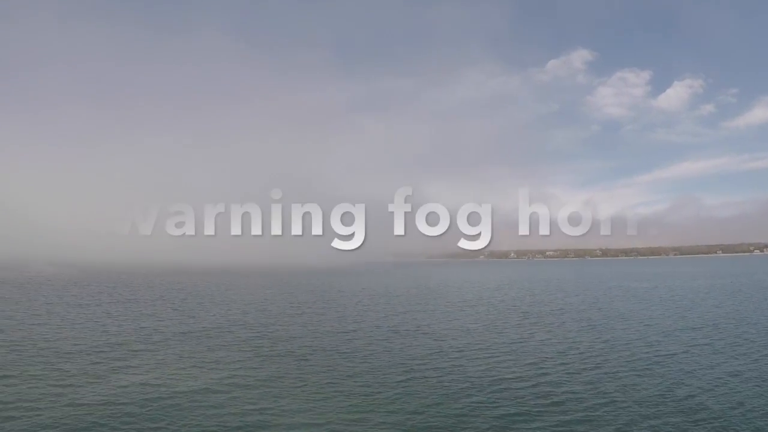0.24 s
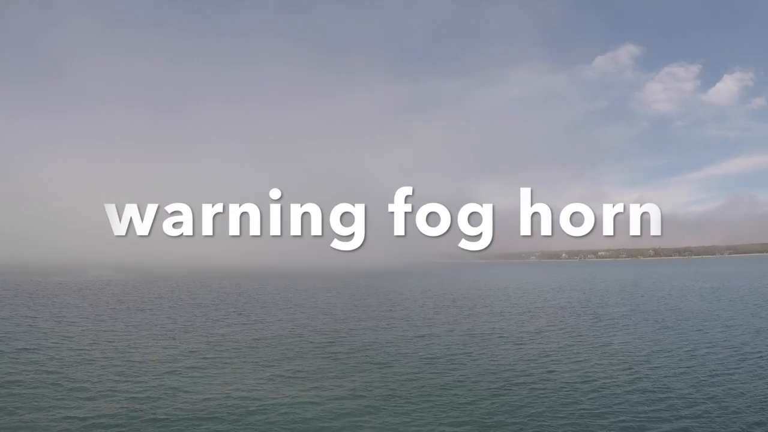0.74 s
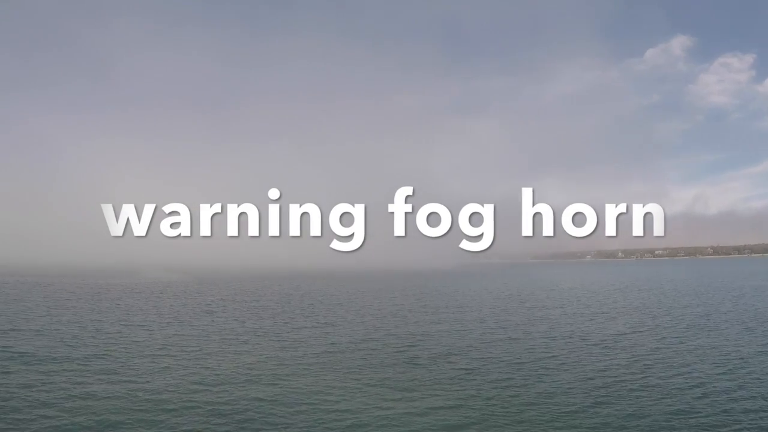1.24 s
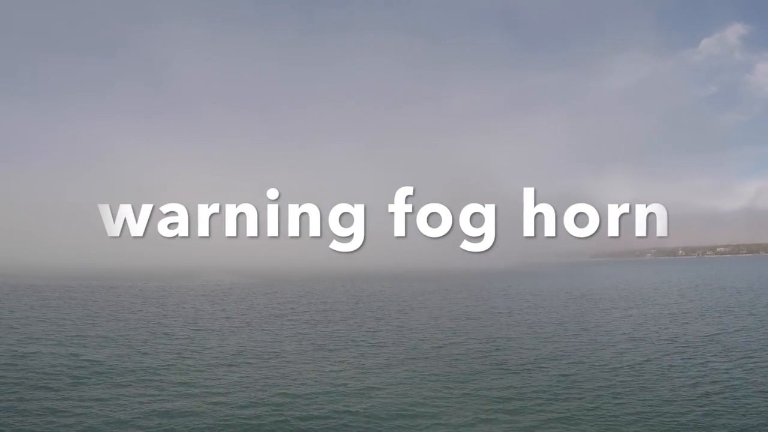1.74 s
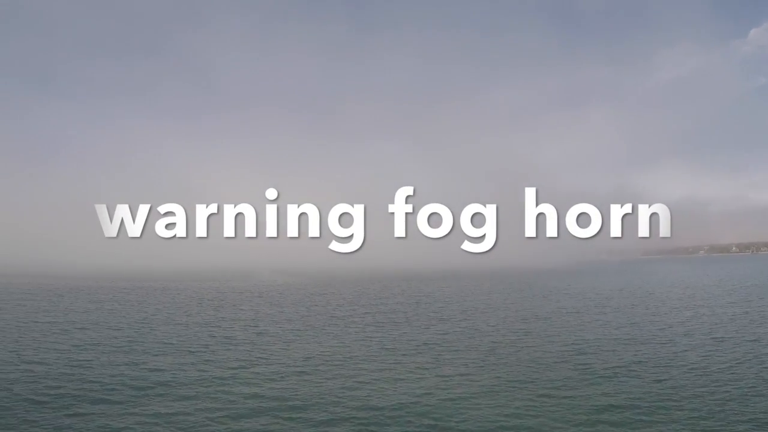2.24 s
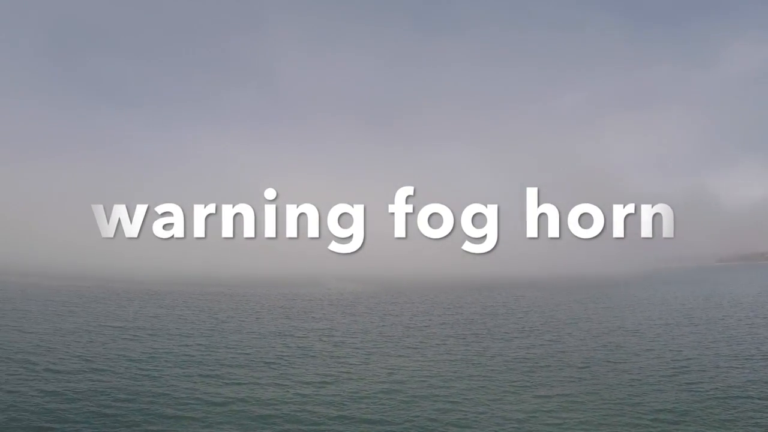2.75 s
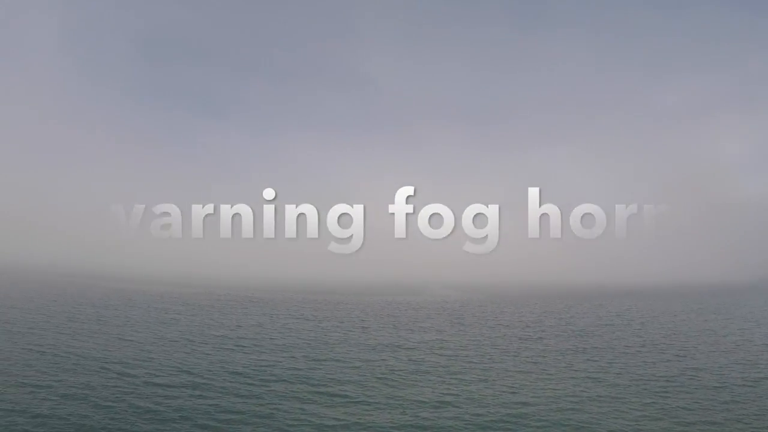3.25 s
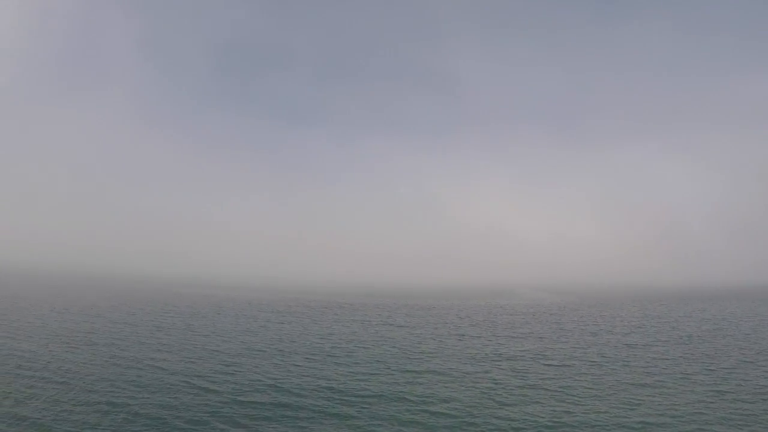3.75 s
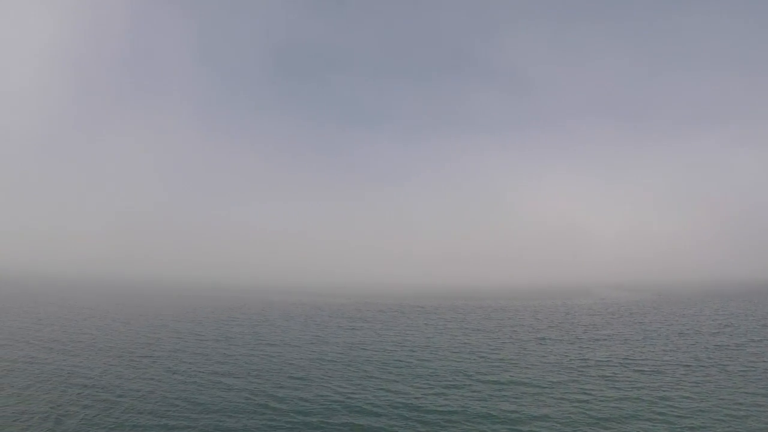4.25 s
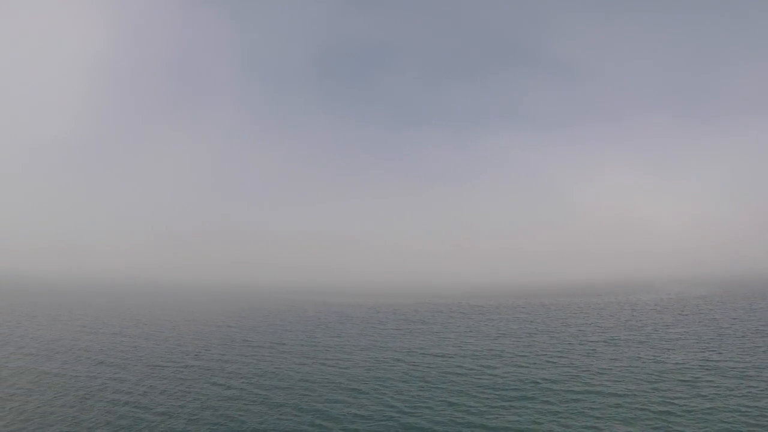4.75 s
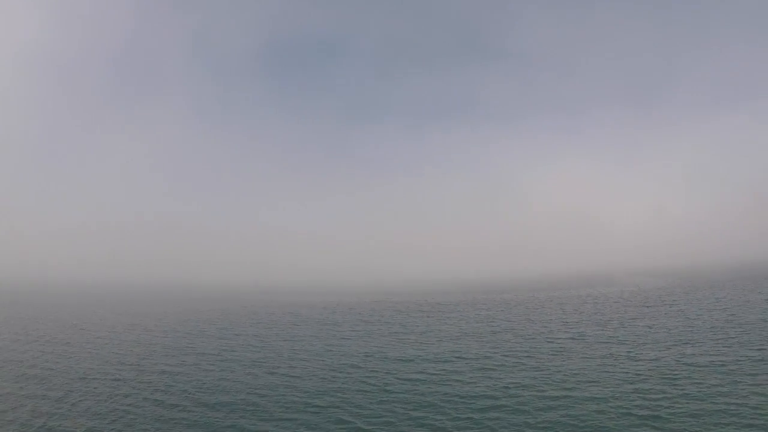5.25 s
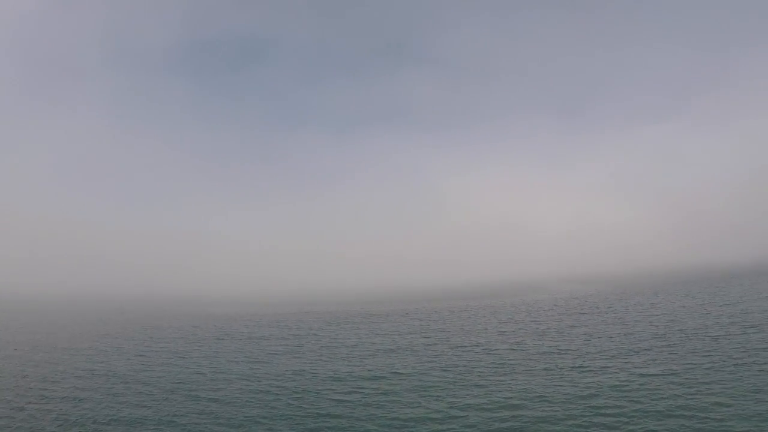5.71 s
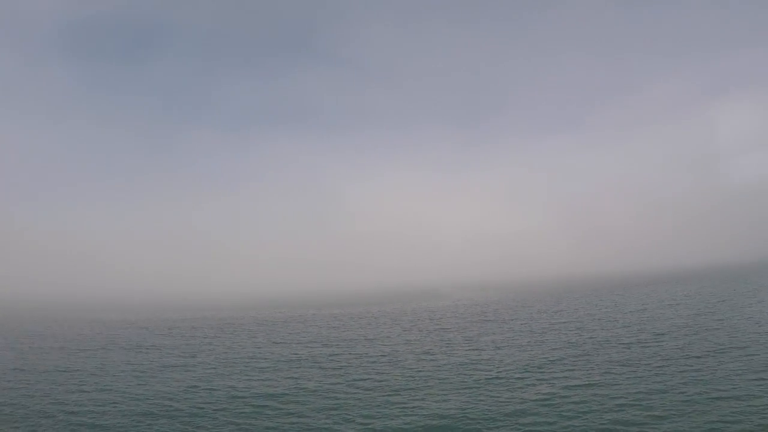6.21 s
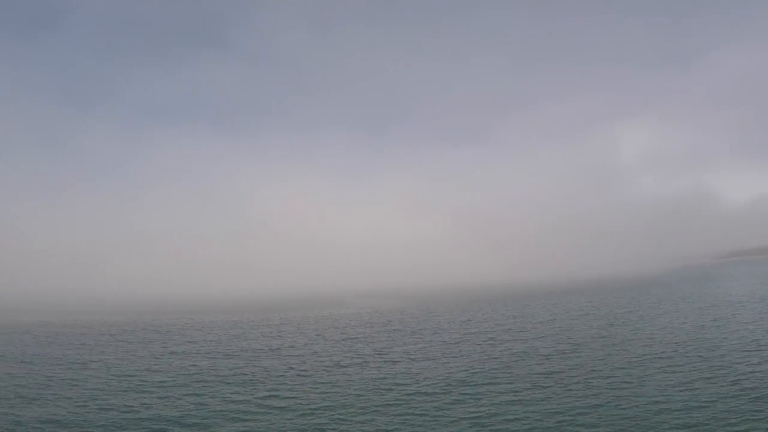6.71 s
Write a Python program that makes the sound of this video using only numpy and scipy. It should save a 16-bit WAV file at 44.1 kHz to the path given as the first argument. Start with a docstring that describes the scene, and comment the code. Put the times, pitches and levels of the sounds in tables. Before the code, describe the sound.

A camera microphone on an open ferry deck takes deep wind buffeting, with a few sharp thumps at the start. Waves wash and hiss along the hull, then wind flutter and wet slaps thicken after three seconds. At about 4.7 seconds a single loud reed horn enters brassy, settles to a steady note near middle C, and holds to the end, pushing wind and water down.

```python
"""A ferry's fog horn heard from the open deck: from 4.7 s to the end it sounds one long reed tone, a sum of
partials whose overtones swell and fade in the moving air, with a faint Doppler-spread answer from the waves.
Wind buffets the microphone, as shaped noise and single suction pulses. Waves break and hiss along the hull,
as noise bands, droplets and ringing slaps, with open sea behind. The camera's limiter pushes all of it down
when the sum is loud, so wind and water sink beneath the horn."""
import sys
import numpy as np
from scipy import signal
from scipy.fft import rfft, irfft, next_fast_len
from scipy.io import wavfile
from scipy.ndimage import uniform_filter1d, minimum_filter1d, map_coordinates

SR = 44100
rng = np.random.default_rng(int(sys.argv[2]) if len(sys.argv) > 2 else 0)


def wav_out(sig):
    """Save sig, one row per channel (or a flat mono array), as 16-bit PCM at SR to the path in sys.argv[1]."""
    wavfile.write(sys.argv[1], SR, np.round(np.clip(np.atleast_2d(sig).T, -1, 1) * 32767).astype(np.int16))


N = 307377

BLAST_S = 4.691  # the horn starts
PITCH_HZ = 265.1  # the settled pitch
SHARP_HZ, SETTLE_S = 3.4, 0.125  # the reed starts sharp and settles
HORN_DB = -1  # gain of the whole horn, echo included
FADING_DB = 1.1  # chance fading of the overtones in the moving air
SPEAK_S, SPEAK_S_PER_MULTIPLE = 0.0091, 0.0029  # how fast the fundamental speaks; extra time per overtone
DISPERSION_RAD = 0.55  # the bell smears the reed's pulse: lag of partial 2, growing as (k - 1) squared
ECHO_BUILD_S = 0.014  # how fast the echo builds up
GLINT_S = 0.065  # half the length of a glint

# single partials that swell or fade for a moment in the moving air:
# (time [s], half length [s], multiple of the pitch, level change [dB])
FLARE_MOMENTS = [(4.715, .025, 2, 5), (6.3, 0.062, 2, 1), (4.79, 0.054, 3, 7.5), (7.7, 0.021, 3, -5),
                 (5.01, 0.039, 3, -11.5), (4.755, .035, 4, 3.5), (4.87, 0.066, 4, 4),
                 (4.97, 0.015, 4, -5.5), (5.25, .1, 4, 0.5), (4.76, 0.029, 5, 5.5), (4.93, .025, 5, -7),
                 (5.01, .06, 5, 3.5), (5.75, 0.088, 5, -12), (6.09, 0.12, 5, 10.5), (5.0, .045, 6, -8),
                 (4.6, 0.092, 6, 4), (6.42, .15, 6, -12.5), (6.75, .15, 6, 4), (8.7, .015, 6, 8),
                 (4.78, .03, 6, -11), (4.75, .035, 7, 7), (4.88, .025, 7, -9), (5.44, .07, 7, -11.5),
                 (5.88, .09, 7, -8), (4.735, .022, 8, 4), (4.705, .014, 5, -7), (4.8, 0.033, 9, 6.5),
                 (4.82, .025, 8, -7.5), (4.89, 0.023, 8, 8), (6.35, .13, 8, -12), (6.85, 0.17, 8, 5),
                 (5.3, .1, 9, -9.5), (5.66, .11, 9, 7), (5.95, .12, 9, -9), (6.48, 0.23, 12, 13.5),
                 (6.5, .09, 13, 10), (6.1, .08, 14, 9)]
# partials that the waves return:
# (multiple of the pitch, level at the blast's start before horn gain [dB], drift [dB/s])
ECHO_PARTIALS = [(1, -32.5, -2), (2, -31.5, -1), (3, -35, -2.5), (4, -39.5, -5.5), (5, -39, -4.5),
                 (6, -47, -2.5), (7, -49.5, -1), (8, -53, -1.5)]
# moments when a wave mirrors one partial strongly:
# (time [s], multiple of the pitch, level over the usual echo [dB])
GLINT_MOMENTS = [(4.92, 3, 9.5), (4.86, 6, 6.5), (5.56, 2, 7.5), (5.56, 3, 0), (5.56, 6, 11), (5.88, 4, 12),
                 (5.93, 3, 3.5), (6.03, 4, 12.5), (6.09, 5, 13), (6.11, 7, 8.5), (6.13, 6, 7), (6.19, 2, 7),
                 (6.19, 3, 6.5), (6.33, 3, 5.5), (5.19, 2, 6), (6.65, 2, 9), (6.72, 5, 7.5), (6.75, 3, 9.5)]


def horn():
    """The reed's partials share one pitch; the high ones shake and fade most, roughest as the blast starts."""
    age = np.maximum(clock() - BLAST_S, 0)
    pitch_hz = PITCH_HZ + SHARP_HZ * np.exp(-(age / SETTLE_S) ** 2) + 0.13 * wobble(7.9)
    phase = 2 * np.pi * np.cumsum(pitch_hz) / SR
    return amp(HORN_DB) * (direct_horn(age, phase) + returned_horn(age, phase))


def direct_horn(age, phase):
    """Partials straight from the bell, each with its own fading, shake, lag and speaking time."""
    out = np.zeros(N)
    for k, level_db in partials(age):
        flare_db = sum(db * bump(s, half) for s, half, which, db in FLARE_MOMENTS if round(which) == k)
        fading_db = FADING_DB * min((k - 1) / 2, 1) * wobble(14)
        size = np.sqrt(2) * amp(level_db + flare_db + fading_db)
        shake = min(0.013 * k, 0.3) * (1 + 2.5 * np.exp(-age / 0.25))
        shake = np.minimum(shake, 0.35)
        lag = DISPERSION_RAD * (k - 1) ** 2
        tone = size * (1 + shake * wobble(35)) * np.cos(k * phase + shake * wobble(25) - lag)
        # the overtones speak a little after the fundamental
        rise_s = SPEAK_S + SPEAK_S_PER_MULTIPLE * min(k - 1, 10)
        out += tone * (1 - np.exp(-(age / rise_s) ** 2))
    return out


def returned_horn(age, phase):
    """The echo builds up as the sound spreads over the water, and comes and goes with the waves."""
    out = np.zeros(N)
    spread = 1 - np.exp(-age / ECHO_BUILD_S)
    for order, level_db, drift_db_per_s in ECHO_PARTIALS:
        k = round(order)
        glint_db = sum(db * bump(s, GLINT_S) for s, which, db in GLINT_MOMENTS if round(which) == k)
        out += amp(level_db + drift_db_per_s * age + glint_db) * spread * sea_echo(phase, k)
    return out


SWELL_S = 0.16  # time for the brassy start to give way
# the sheen's offset; its extra at the start; time to dull
SHEEN_DB, SHEEN_START_DB, SHEEN_S = -9, 10.5, 0.8

# horn partials in order, each sliding once to a new level:
# (multiple of the pitch, level before swell and gain [dB], slide [dB], slide middle [s], half slide time [s])
HORN_PARTIALS = [(1, -0.5, 0, 6, .14), (2, -12.5, -6, 6.58, .14), (3, -21, -12, 6.07, 0.056),
                 (4, -26.5, -17.5, 5.49, .24), (5, -27, -15.5, 5.87, .2), (6, -37.5, -6.5, 6.1, .14),
                 (7, -45, 3.5, 6.55, .1), (8, -47.5, -0.5, 6.1, .14), (9, -51.5, 10, 6.4, .25),
                 (10, -57.5, 15.5, 5.82, .1), (11, -54, 4.5, 6.65, .1), (12, -49.5, -11.5, 5.58, .14),
                 (13, -52.5, 3.5, 7.1, .14)]
# the brassy start, before the lowest partials swell: (frequency [Hz], level change at the start [dB])
BRASSY_START = [(265, -9.5), (530, -9.5), (795, 1.5), (1060, 0.5), (1325, -1.5), (1590, 1), (2400, 6.5),
                (3500, -2.5), (7000, 3)]
# the horn's thin top: (frequency [Hz], level before the sheen offset [dB])
SHEEN_SPECTRUM = [(3700, -51.5), (4300, -56.5), (5200, -61.5), (6200, -69.5), (7100, -55.5), (8000, -66.5),
                  (9300, -80.5)]


def partials(age):
    """Each multiple of the pitch with its level in dB: a reed starts brassy, then its lowest partials swell."""
    t = clock()
    early = np.exp(-(age / SWELL_S) ** 2)
    for k, (_, db, slide_db, slide_at, slide_s) in enumerate(HORN_PARTIALS, 1):
        slid = (1 + np.tanh((t - slide_at) / slide_s)) / 2
        yield k, db + along(BRASSY_START, k * PITCH_HZ) * early + slide_db * slid
    for k in range(len(HORN_PARTIALS) + 1, 33):
        dulling_db = SHEEN_START_DB * np.exp(-age / SHEEN_S)
        yield k, SHEEN_DB + along(SHEEN_SPECTRUM, k * PITCH_HZ) + dulling_db


def sea_echo(phase, order, spread_hz=90):
    """Waves all round the moving ship return a partial with a spread of Doppler shifts, at rms 1."""
    sine = np.sin(order * phase)
    around = wobble(2 * spread_hz) * sine + wobble(2 * spread_hz) * np.cos(order * phase)
    # the water straight ahead answers sharpest in pitch
    ahead = 0.9 * wobble(22) * np.sin(order * phase * 1.036)
    # choppy water gives each partial a wide, fluttering skirt
    chop = 0.22 * wobble(330) * sine * amp(4 * np.tanh(wobble(35)))
    coming_and_going_db = 4.5 * np.tanh(wobble(24)) + 1.5 * np.tanh(wobble(9))
    return unit((around + ahead + chop) * amp(coming_and_going_db))


# wind on the microphone, before trims and rounding: (time [s], deep buffet level [dB], flutter level [dB])
WIND_GUSTS = [(0, -21.5, -24), (.5, -24.5, -24), (.9, -21.5, -28), (1.3, -21, -27), (1.55, -22.5, -25),
              (1.95, -24.5, -24), (2.35, -22, -26), (2.65, -24, -27.5), (3.03, -22.5, -22),
              (3.33, -25.5, -17.5), (3.75, -24, -17), (4.25, -27.5, -18), (4.6, -28.5, -17),
              (5.35, -31, -20), (6.1, -25, -23), (6.97, -24.5, -27.5)]
# how regularly the camera body sheds eddies: (time [s], share of flutter power, clipped to 0-1 [fraction])
SHEDDING_SHARE = [(0, 0.08), (2.9, 0.07), (3.3, 1.02), (4.6, 0.55), (5, 0.08), (6.97, 0.7)]
# large eddies: (frequency [Hz], relative level [dB per Hz])
BUFFET_SPECTRUM = [(8, -10), (22, -5), (45, -6), (62, -6.5), (90, -30.5), (200, -50.5), (600, -89)]
# small eddies: (frequency [Hz], relative level [dB per Hz])
FLUTTER_SPECTRUM = [(35, -26), (65, -2.5), (90, 3.5), (122, -3.5), (155, -12), (210, -16), (320, -21.5),
                    (900, -73)]
# steadily shed eddies, before soft clipping: (frequency [Hz], relative level [dB per Hz])
VORTEX_SPECTRUM = [(40, -22.5), (62, 3), (75, 2.5), (98, 2), (122, -1.5), (140, -8), (175, -28), (300, -42),
                   (900, -71.5)]


def wind():
    """Large and small eddies push on the microphone; head on, the body sheds them at a steadier rate."""
    buffet_db, flutter_db = curves(WIND_GUSTS)
    share = np.clip(curves(SHEDDING_SHARE)[0], 0, 1)
    shed = unit(np.tanh(0.41 * noise(VORTEX_SPECTRUM, patchy_db=2.0)))
    shed = coloured(shed, [(200, 6), (400, -6.5), (1500, -50.0)])
    flutter = np.sqrt(1 - share) * noise(FLUTTER_SPECTRUM, patchy_db=0.5) + np.sqrt(share) * shed
    surge_db = wobble(5)
    eddies = amp(buffet_db + 0.4 + surge_db) * noise(BUFFET_SPECTRUM, patchy_db=0.3)
    # steady shedding does not surge
    eddies += amp(flutter_db - 0.38 + (1 - share) * surge_db) * flutter
    # the strongest pushes are rounded off
    return eddies / (1 + (eddies / 0.37) ** 4) ** (1 / 4)


# eddies that strike the microphone: (time [s], peak level [dB], width [s])
EDDY_POPS = [(0.0236, -11, 0.0011), (0.035, -8, 0.0019), (0.037, -16.5, 0.00037), (0.078, -20.5, 0.00088),
             (0.118, -16, 0.0016), (0.149, -13, 0.0012), (0.199, -10, 0.00064), (.609, -13.5, 0.002),
             (4.746, -12, 0.0017), (5.59, -20, .002)]


def pops():
    """A sharp eddy gives one brief suction with a rebound on either side."""
    out = np.zeros(N)
    for s, db, width in EDDY_POPS:
        u = (clock() - s) / width
        out -= amp(db) * (1 - u ** 2) * np.exp(-u ** 2 / 2) / (1 + 0.5 * u ** 2)
    return out


# rushing air: (frequency [Hz], relative level [dB per Hz])
RUSH_SPECTRUM = [(120, -28.5), (230, -10), (330, 3.5), (480, 0), (720, -3.5), (1000, -16.5), (1600, -15.5),
                 (4000, -68)]
# crackle while the wind meets the microphone head on: (time [s], level against the untrimmed rush [dB])
CRACKLE_LEVEL = [(0, -15.5), (3.2, -19.5), (3.6, -6), (4.05, -5.5), (4.25, -12), (4.55, -4.5), (4.8, -14),
                 (6.97, -11.5)]


def rushing_air():
    """Air rushes past the microphone, growing with the flutter, and eddies crackle in it as short bursts."""
    # -27 dB at full-scale flutter, before the air's trim; 0.52 dB per dB of flutter
    rush_db = -27 + 0.52 * curves(WIND_GUSTS)[1]
    air = amp(rush_db - 6 + 0.69 * wobble(41)) * noise(RUSH_SPECTRUM, patchy_db=2.0)
    bursts = droplets(rush_db, centre_hz=777, cycles=0.71, spread_db=2.0)
    return air + amp(curves(CRACKLE_LEVEL)[0]) * bursts


# wash along the hull: (frequency [Hz], relative level [dB per Hz])
WASH_SPECTRUM = [(250, -20), (500, -6), (850, -1.5), (1250, 0), (1650, -1.5), (2100, -6.5), (2550, -11),
                 (3000, -16.5), (4500, -15.5), (9000, -65.5)]
# tumbling crests: (frequency [Hz], relative level [dB per Hz])
CREST_SPECTRUM = [(800, -26), (1350, -5.5), (1700, -0.5), (2050, -2), (2500, -9), (3100, -22.5),
                  (5000, -50)]
# spray: (frequency [Hz], relative level [dB per Hz])
SPRAY_SPECTRUM = [(1800, -20), (3050, -17.5), (3600, 1.5), (4100, 1), (5000, -4.5), (6000, -10.5),
                  (7500, -24), (10000, -49.5)]
# fizzing foam: (frequency [Hz], relative level [dB per Hz])
FIZZ_SPECTRUM = [(3500, -26.5), (5200, 0), (6200, 1), (7200, -1), (8300, -9), (10000, -19), (12500, -57)]


def breaking_waves():
    """Water along the hull: wash, tumbling crests, spray, fizzing foam and droplets, each a noise band or burst."""
    wash_db, crest_db, spray_db, fizz_db = surf()
    surge_db = wobble(30)
    wash = amp(wash_db - 1.1 + 0.9 * surge_db) * noise(WASH_SPECTRUM, patchy_db=1.5)
    crest = amp(crest_db + 1.2 * wobble(45)) * noise(CREST_SPECTRUM, patchy_db=1.5)
    spray = amp(spray_db - 1.5) * noise(SPRAY_SPECTRUM, patchy_db=0.8)
    fizz = amp(fizz_db + 2.0) * noise(FIZZ_SPECTRUM, patchy_db=0.8)
    hiss = amp(0.53 * surge_db) * (spray + fizz)
    return wash + crest + hiss + droplets(wash_db - 7.5)


WAVE_FALL_S = 0.16  # time for a wave to die down to about a third

# waves that break along the hull, levels before trims: (start [s], time to break [s], length [s],
# wash level [dB], crest level [dB], spray level [dB], fizz level [dB])
HULL_WAVES = [(-.15, .19, .21, -43.5, -56, -54, -62), (.243, 0.17, 0.27, -47.5, -52, -54, -61),
              (1.12, 0.27, 0.21, -39.5, -43, -50.5, -55), (1.516, 0.18, .62, -45, -50.5, -47.5, -57),
              (2.87, 0.14, 0.32, -45, -47, -48.5, -62.5), (3.214, 0.16, 0.41, -45.5, -43, -45.5, -61.5),
              (3.586, .19, 0.3, -40, -46, -48.5, -66), (3.91, 0.16, 0.44, -41.5, -53.5, -51.5, -67),
              (4.34, .17, .41, -37.5, -52.5, -48.5, -62), (4.899, 0.17, 0.67, -53, -65, -54.5, -61.5),
              (5.869, 0.2, .44, -55, -61, -52, -59.5), (6.548, .19, .23, -56.5, -60, -54, -69)]
# between waves, before trims: (wash level [dB], crest level [dB], spray level [dB], fizz level [dB])
CALM_LEVELS = (-50.5, -60.5, -59, -73.5)


def surf():
    """Levels in dB of wash, crest, spray and fizz: each wave rises, holds and dies away over the calm."""
    t = clock()
    power = amp(CALM_LEVELS)[:, None] ** 2 * np.ones(N)
    for s, rise_s, length, *db in HULL_WAVES:
        rise = np.sin(np.pi / 2 * np.clip((t - s) / rise_s, 0, 1))
        fall = np.exp(-np.maximum(t - s - length, 0) / WAVE_FALL_S)
        power += np.outer(amp(db) ** 2, (rise * fall) ** 2)
    return 10 * np.log10(power)


def droplets(level_db, centre_hz=1500, cycles=3.0, spread_db=4.0):
    """Tiny decaying sine bursts, each a few cycles or less; a few are much larger than the rest."""
    count = 2000
    when, pitch, size = rng.uniform(1e-4, 1 - 1e-4, (count, 3)).T
    hz = centre_hz * np.exp(0.55 * (2 * pitch - 1))[:, None]
    t = np.arange(SR // 100) / SR
    height = amp(-spread_db * np.maximum(np.log(size), -4))[:, None]
    grains = height * np.sin(2 * np.pi * hz * t) * np.exp(-t * hz / cycles)
    grains = grains * rng.choice([-1, 1], (count, 1))
    at = (when * N).astype(int)[:, None] + np.arange(len(t))
    return amp(level_db) * unit(np.bincount(at.ravel(), grains.ravel(), N)[:N])


# slaps that stand out of the wash: (time [s], peak level [dB], centre pitch [Hz])
WASH_SLAPS = [(1.335, -29, 795), (2.323, -36.5, 3760), (2.547, -43, 3730), (3.3812, -27.5, 1750),
              (3.4673, -22, 1715), (3.4882, -29.5, 1610), (3.5675, -23.5, 1720), (3.581, -25.5, 700),
              (3.634, -27, 450), (3.681, -25, 560), (3.689, -24, 1300), (3.7784, -30, 1600),
              (3.79, -25, 450), (3.7993, -23.5, 1515), (3.8363, -30, 1440), (3.844, -30.5, 420),
              (3.8888, -25.5, 1760), (3.907, -28, 420), (3.9084, -30.5, 1486), (3.9843, -25, 1650),
              (4.025, -24, 556), (4.074, -25, 430), (4.1547, -30.5, 1457), (4.1978, -29.5, 1580),
              (4.265, -33, 2670), (4.4315, -30, 1625), (4.441, -28, 380), (4.5216, -19.5, 1390),
              (4.544, -24, 450), (4.587, -35.5, 2550), (4.877, -31, 1740), (5.578, -36, 1860)]


def splashes(decay_s=0.00425, spread=0.28):
    """Short slaps of water stand out of the wash, each a cluster of tiny ringing bubbles."""
    out = np.zeros(N + SR)
    t = np.arange(SR // 25) / SR
    for s, db, hz in WASH_SLAPS:
        size, delay = rng.uniform(0, 1, size=(2, 8, 1))  # eight bubbles
        age = np.maximum(t - 0.0025 * delay ** 2, 0)
        bubble_hz = hz * np.exp(spread * (2 * size - 1))
        slap = np.sum(np.sin(2 * np.pi * bubble_hz * age) * np.exp(-age / decay_s), axis=0)
        out[round(s * SR):][:len(t)] += amp(db) * slap / np.abs(slap).max()
    return out[:N]


# the open sea all round: (frequency [Hz], relative level [dB per Hz])
SEA_SPECTRUM = [(200, -5.5), (900, -9.5), (2000, -16.5), (3000, -8.5), (4200, -14.5), (7000, -26.5),
                (11000, -50.5)]


def open_sea(sea_db=-60):
    """The open sea all round the ship: steady, patchy noise."""
    return amp(sea_db) * noise(SEA_SPECTRUM, patchy_db=3.5)


def amp(db):
    """Decibels to gain."""
    return 10 ** (np.asarray(db) / 20)


def unit(x):
    """Scaled to rms 1."""
    return x / np.sqrt(np.mean(x ** 2) + 1e-20)


def along(points, hz):
    """(Hz, value) points read on a log frequency axis."""
    f, v = np.transpose(points)
    return np.interp(np.log(hz + 1), np.log(f + 1), v)


def clock():
    """The time of each sample in seconds."""
    return np.arange(N) / SR


def curves(rows):
    """One value per sample for each column after the time."""
    s, *cols = np.transpose(rows)
    return [np.interp(clock(), s, c) for c in cols]


def wobble(rate):
    """A smooth random curve, rate knots a second."""
    coarse = np.linspace(0, N / SR, N // 32)
    knots = rng.standard_normal(4096)
    return np.interp(clock(), coarse, map_coordinates(knots, [coarse * rate], mode="wrap"))


def bump(s, half_length):
    """A smooth hill of height 1 around a moment."""
    return np.exp(-((clock() - s) / half_length) ** 2)


def filtered(x, response):
    """x times a response of frequency."""
    m = next_fast_len(N + SR // 2)
    return irfft(rfft(x, m) * response(np.fft.rfftfreq(m, 1 / SR)), m)[:N]


def coloured(x, spectrum):
    """x given a spectrum, at rms 1."""
    return unit(filtered(x, lambda hz: amp(along(spectrum, hz))))


def noise(spectrum, patchy_db):
    """Noise of rms 1 with patches of random gain in time and frequency."""
    z = signal.stft(rng.standard_normal(N), nperseg=512)[2]
    field = uniform_filter1d(rng.standard_normal(z.shape), size=6, axis=0)
    field = uniform_filter1d(field, size=10, axis=1)
    patchy = signal.istft(z * amp(patchy_db * unit(field)), nperseg=512)[1][:N]
    return coloured(patchy, spectrum)


def scene():
    """Horn, wind and water summed at one microphone on the open deck."""
    at_microphone = wind() + pops() + rushing_air()
    along_hull = breaking_waves() + splashes()
    return (horn() + at_microphone + along_hull + open_sea())[None]


CEILING, HOLD_S, EASE_S = 0.48, 0.02, 0.018  # the limiter's peak level, hold time and smoothing time
TOP_HZ = 11500  # band limit


def record(dry):
    """The camera's limiter turns everything down when the sum passes its ceiling; then a band limit cuts the top."""
    needed = CEILING / np.maximum(np.abs(dry[0]), CEILING)
    hold = max(int(HOLD_S * SR), 1)
    held = minimum_filter1d(needed, hold, origin=(hold - 1) // 2)
    gain = uniform_filter1d(held, max(int(EASE_S * SR), 1))
    return filtered(dry[0] * gain, lambda hz: hz < TOP_HZ)[None]


dry = scene()
out = record(dry)
wav_out(out)
```